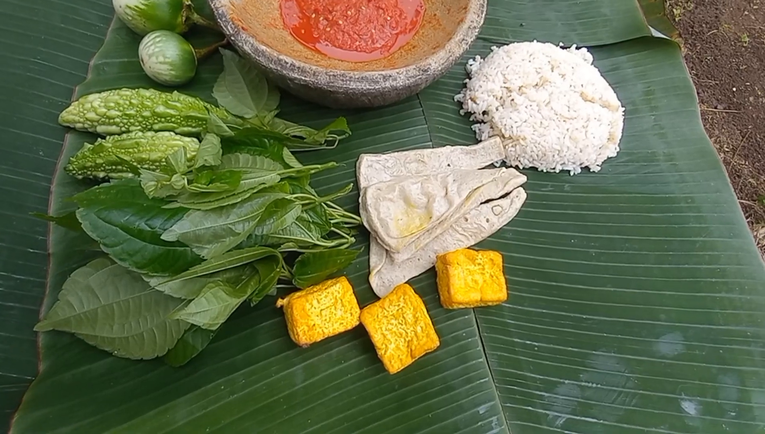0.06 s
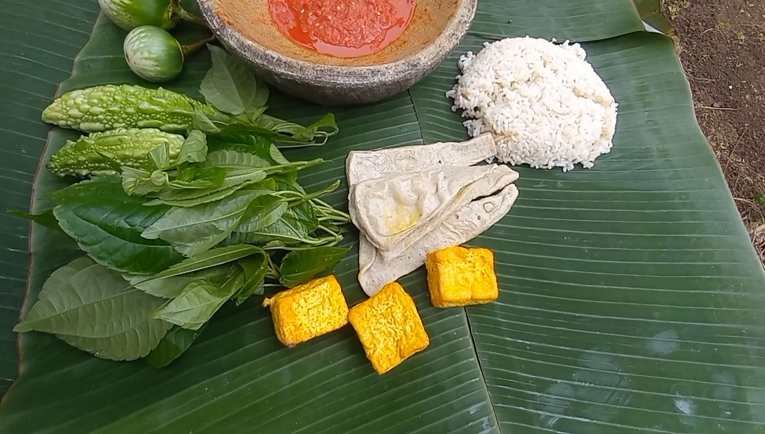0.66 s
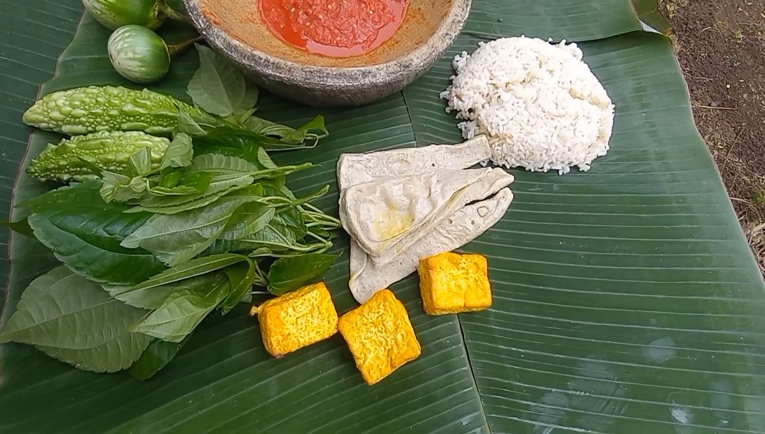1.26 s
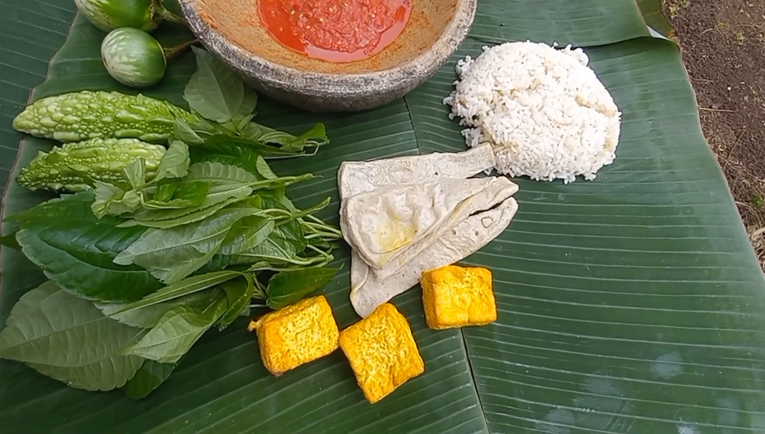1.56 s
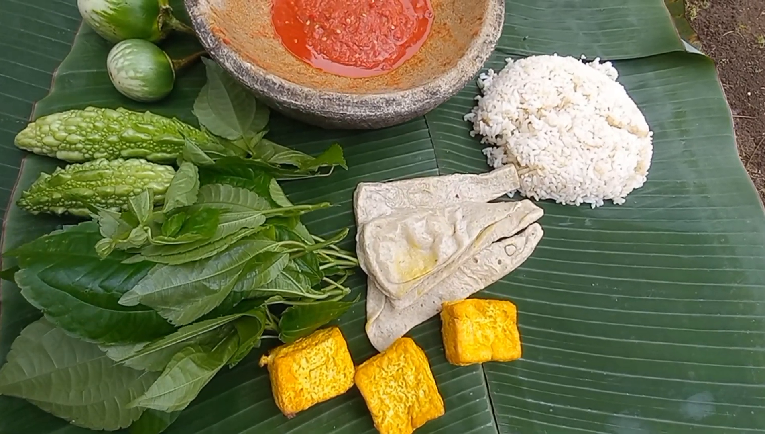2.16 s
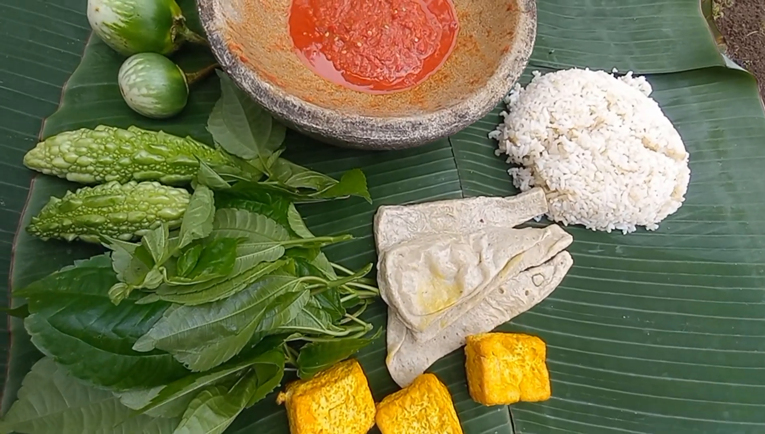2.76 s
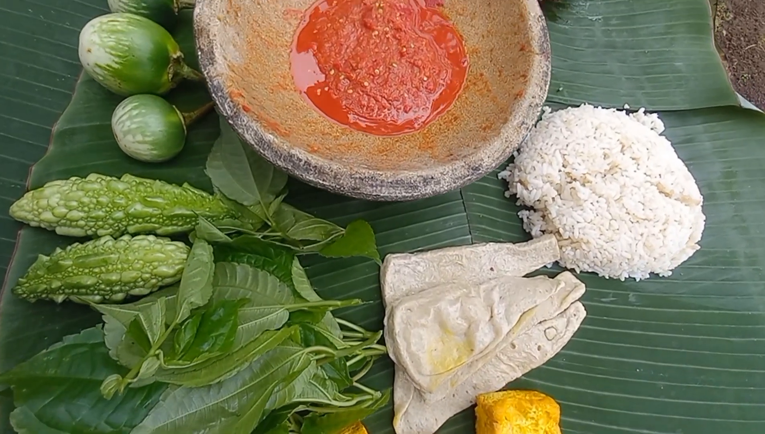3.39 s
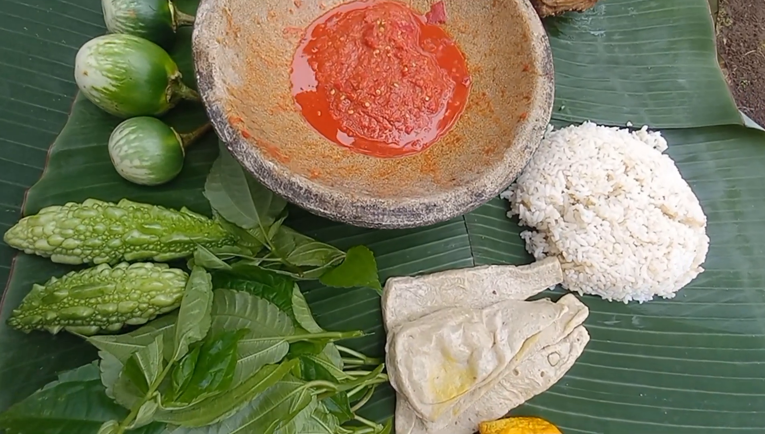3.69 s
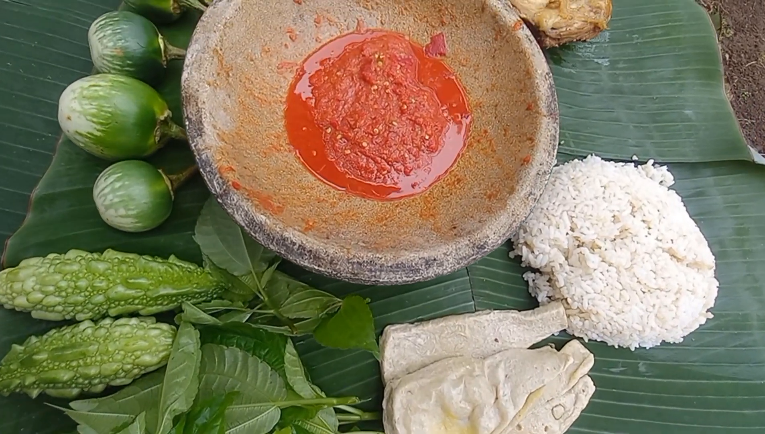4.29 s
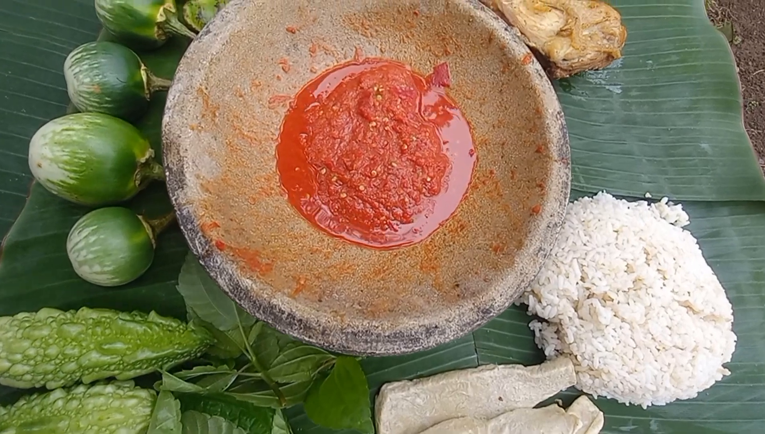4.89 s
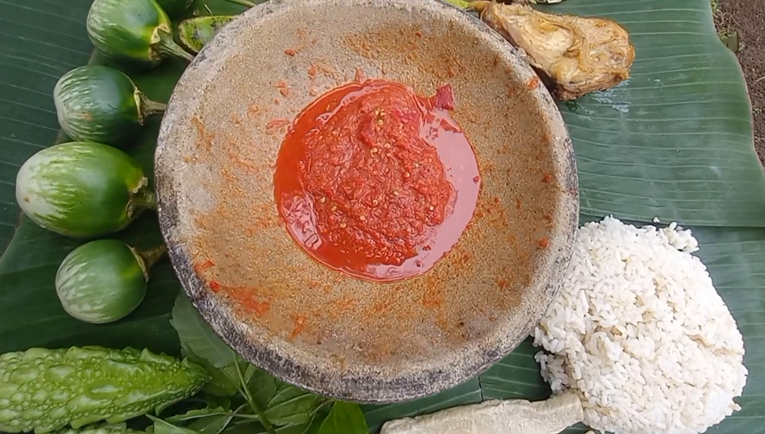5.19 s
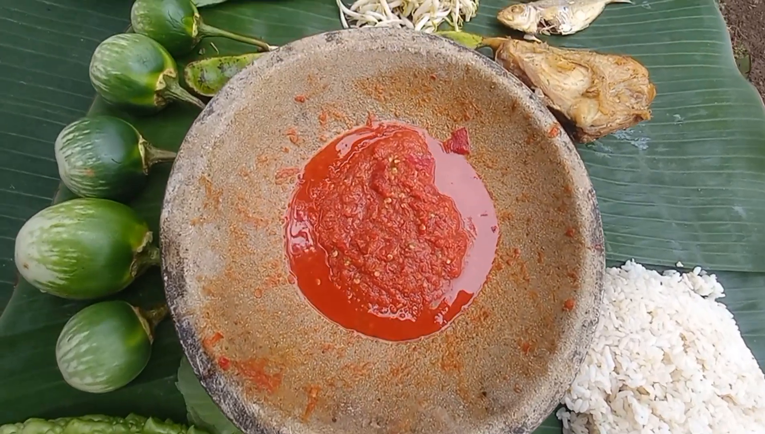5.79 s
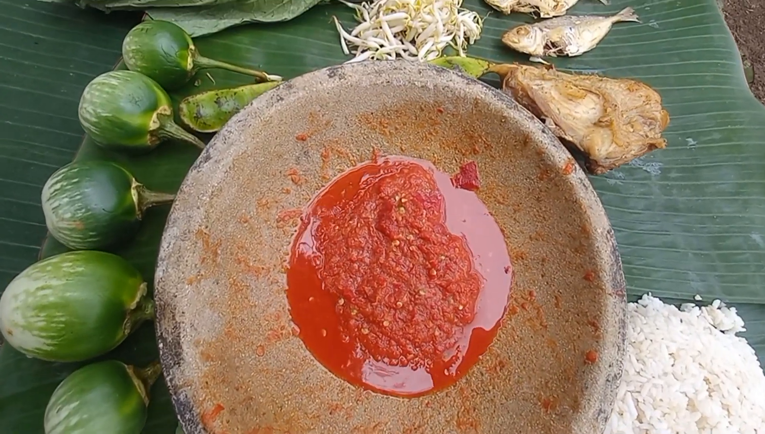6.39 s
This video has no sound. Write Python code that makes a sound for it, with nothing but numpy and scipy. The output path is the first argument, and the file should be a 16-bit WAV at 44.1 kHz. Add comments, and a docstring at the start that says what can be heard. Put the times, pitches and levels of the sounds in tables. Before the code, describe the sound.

High slurred bird whistles, then rapid trills and buzzes, sound close by, with faint distant birdsong and a low traffic-like hum behind.

```python
"""A garden opens on a low rumble like far traffic, a light hiss and soft, distant notes and warbles.
Half a second in, a close songbird sings pure slurred whistles that step down from high hooks to low
scoops; leaves and walls give a short echo, and faint dry ticks come and go. Distant notes fill its pause.
From about 4.4 s it sings chips, then pulsed trills and buzzes made by a fast flutter of its syrinx,
with one dull knock early in the phrase. After 6 s the distant notes are left over the background."""
import sys
import numpy as np
from scipy import signal
from scipy.fft import rfft, irfft, next_fast_len
from scipy.io import wavfile
from scipy.ndimage import map_coordinates

SR = 44100
rng = np.random.default_rng(int(sys.argv[2]) if len(sys.argv) > 2 else 0)


def pcm_store(signal):
    """Save signal as 16-bit PCM."""
    levels = np.round(np.clip(np.atleast_2d(signal), -1, 1) * 32767)
    wavfile.write(sys.argv[1], SR, levels.astype(np.int16).T)


N = 293265

# Cue levels are fader settings, ahead of each layer's trim and EQ.
# Whistle cues of the near bird: shape, start_s, length_s, pitch_hz, level_db
NEAR_WHISTLES = [ ("hook", .501, .083, 6970, -51.5), ("hook", .654, .089, 6890, -39),
                 ("hook", .82, .093, 6770, -39.5), ("peak", .973, .062, 5880, -36.5),
                 ("peak", 1.074, .065, 5730, -32), ("peak", 1.171, .061, 5710, -31),
                 ("peak", 1.276, .065, 5800, -32.5), ("dip", 1.374, .153, 3685, -31.2),
                 ("dip", 1.576, .152, 3625, -29), ("wave", 1.783, .156, 3790, -29),
                 ("step", 1.99, .151, 3015, -31.3), ("step", 2.192, .15, 2975, -31.3),
                 ("arch", 2.39, .033, 3064, -33.5), ("rise", 2.421, .047, 3586, -30.5),
                 ("scoop", 2.499, .191, 2615, -32.4), ("scoop", 2.74, .189, 2680, -35.5),
                 ("scoop", 2.989, .195, 2515, -35.6), ("spire", 3.256, .102, 4160, -38.5),
                 ("rise", 4.429, .042, 4286, -47), ("vee", 4.662, .024, 4410, -38.5),
                 ("fall", 4.697, .046, 5580, -37.5), ("rise", 4.784, .022, 4100, -46),
                 ("rise", 4.812, .052, 3750, -40.5), ("rise", 5.447, .042, 3340, -38),
                 ("zigzag", 5.674, .059, 4400, -37), ("arch", 5.766, .019, 4420, -36),
                 ("fall", 5.782, .015, 3050, -37.5)]
# Distant whistles, plus at 4.428 s a low undertone an octave below the near bird's rising chip:
# shape, start_s, length_s, pitch_hz, level_db
SOFT_NOTES = [ ("hook", .018, .085, 6600, -73), ("hook", .205, .075, 6600, -70),
              ("dip", .368, .125, 3600, -70), ("hook", .6, .1, 5300, -65), ("curl", .796, .108, 3120, -68),
              ("level", .815, .065, 5600, -65), ("level", 1.04, .13, 4420, -58),
              ("curl", 1.056, .108, 3050, -66), ("climb", 1.69, .11, 3100, -68),
              ("slide", 1.88, .09, 6400, -67), ("level", 2.793, .124, 6800, -55),
              ("fall", 3.507, .077, 3950, -65), ("vee", 3.637, .075, 5850, -59),
              ("level", 3.755, .092, 5400, -60), ("fall", 3.865, .08, 4500, -62),
              ("arch", 4.428, .07, 2150, -44.5), ("arch", 4.45, .123, 6700, -58),
              ("fall", 4.755, .04, 5400, -57), ("fall", 4.893, .055, 4900, -53),
              ("climb", 4.978, .014, 4800, -50), ("arch", 5.044, .052, 4990, -54),
              ("climb", 5.165, .075, 3750, -58), ("level", 5.279, .103, 2120, -51),
              ("slide", 5.355, .095, 4400, -56), ("level", 5.536, .097, 3180, -53),
              ("peak", 6.08, .085, 4400, -59), ("peak", 6.228, .092, 4400, -60),
              ("climb", 6.38, .08, 3400, -60), ("arch", 6.45, .058, 4200, -57),
              ("vee", 6.565, .09, 3650, -58)]
# Whistle repertoire, by shape: attack_share, release_share, swell_db, [(note_share, pitch_ratio)]
WHISTLE_SHAPES = { "hook": (.43, .27, 13, [(0, 1.1), (.35, 1.03), (.65, 1), (.81, .88), (1, .63)]),
                  "peak": (.24, .29, 2, [(0, .79), (.2, .815), (.51, 1), (.82, .75), (1, .6)]),
                  "dip": (.25, .19, -1.5, [(0, 1.21), (.315, 1.15), (.565, 1), (.88, 1.21), (1, 1.22)]),
                  "wave": (.22, .13, -5, [(0, 1.06), (.26, 1), (.5, 1.12), (.87, .88), (1, .69)]),
                  "step": (.14, .19, -.8, [(0, .71), (.25, 1), (.5, .985), (.64, 1.06), (.78, 1.5),
                  (.87, 1.15), (1, .82)]), "scoop": (.12, .125, -1.5, [(0, 1.375), (.14, 1.19), (.46, 1),
                  (.73, 1.16), (.85, 1.39), (.92, 1.75), (1, 2.5)]), "spire": (.2, .15, -4, [(0, .52),
                  (.27, .63), (.49, .72), (.61, 1), (.73, .74), (1, .54)]), "rise": (.38, .28, 0, [(0, .64),
                  (.35, .91), (.72, 1), (1, .96)]), "arch": (.35, .25, -2, [(0, .88), (.35, 1), (1, .7)]),
                  "fall": (.35, .3, -5, [(0, 1.28), (.4, 1), (1, .74)]), "climb": (.3, .3, 0, [(0, .85),
                  (.5, 1), (1, 1.24)]), "curl": (.15, .15, 0, [(0, .93), (.2, 1.12), (.58, 1), (1, 1.28)]),
                  "slide": (.15, .2, 0, [(0, 1.1), (1, .9)]), "level": (.25, .3, 0, [(0, 1.025),
                  (1, .975)]), "vee": (.3, .15, 0, [(0, 1.25), (.5, 1), (1, 1.35)]),
                  "zigzag": (.1, .15, 0, [(0, 1.02), (.15, 1.11), (.27, 1.34), (.37, .75), (.53, 1.17),
                  (.63, .755), (.7, 1.01), (.85, .91), (1, .97)])}
# Trills of the near bird, plus the soft "warble" rows from farther off:
# voice, start_s, length_s, flutter_hz, swing_hz, level_db, [pitch_hz at even steps]
TRILL_CUES = [ ("warble", .06, .32, 141, 141, -62.5, [2050, 2520, 2960]),
              ("warble", .43, .075, 51, 450, -62, [4580, 4520]),
              ("warble", .64, .085, 51, 550, -56, [4600, 4450]),
              ("warble", .85, .1, 51, 550, -56, [4670, 4360]),
              ("warble", 3.91, .24, 141, 60, -54.5, [2440, 2320, 2200]),
              ("rasp", 4.898, .066, 660, 450, -43.5, [4600, 3300, 2500, 2080]),
              ("chip", 4.987, .015, 342, 254, -34, [3000, 3630, 3200]),
              ("rasp", 5.052, .036, 446, 300, -39, [2810, 2620]),
              ("pulsed", 5.08, .092, 70.8, 485, -34, [2450, 2700, 2950, 2840]),
              ("pulsed", 5.2085, .148, 89.4, -400, -33.3, [4950, 5620, 5450]),
              ("rasp", 5.432, .022, 626, 395, -38, [2800, 3000]),
              ("twang", 5.483, .066, 501, 380, -33, [4600, 4420, 4640, 4450, 4150]),
              ("rasp", 5.616, .028, 776, 952, -33, [3900, 4450, 4150, 4600, 3700]),
              ("pulsed", 5.796, .046, 91, 211, -33.5, [2480, 2230, 2050]),
              ("rasp", 5.882, .033, 724, 657, -40.5, [3270, 4070, 3700, 3320]),
              ("buzz", 5.916, .142, 228.1, 260, -34.3, [3150, 3890, 3850, 3050, 2750, 2650])]
# Kinds of flutter, by voice: chop_depth (over 1 leaves silent gaps), roughness, undertone_gain,
# attack_share, release_share, swell_db
TRILL_VOICES = {"warble": (.48, .25, .02, .35, .3, 2), "pulsed": (1.05, .09, .003, .08, .1, 0),
                "twang": (.31, .22, .12, .15, .3, -1), "rasp": (.33, .22, .04, .3, .33, -3),
                "chip": (.2, .04, 0, .55, .4, 0), "buzz": (.16, .1, .004, .27, .14, -8)}
# How strongly the throat carries each pitch: pitch_hz, gain_db
THROAT_EQ = [(2000, -17), (2550, -9.4), (3000, -.5), (3800, -2), (4400, -2.5), (4900, -1.5), (6200, -.5),
             (7000, -5), (7700, -23)]
# Pan of the main song: time_s, left_minus_right_db
SONG_PAN = [(.7, 1.5), (1.2, 2), (1.7, 0.5), (2.1, -2), (2.8, 0.5), (4.7, -3), (5.8, -2)]
# Tone of the reflections off leaves and walls: frequency_hz, gain_db
ECHO_EQ = [(2000, -6), (3200, 7.5), (4400, 6.5), (6000, 9.5), (8000, -10), (14000, -26)]
# Fader rides of the low drone and the rumble around it: time_s, level_db
DRONE_RIDE = [(0.0, -67), (0.96, -68), (1.11, -48), (1.22, -74), (1.41, -52), (1.65, -63), (2.04, -49),
              (2.81, -54), (3.11, -74), (3.28, -49), (3.46, -69), (3.59, -52), (3.83, -74), (4.04, -51),
              (5.3, -66), (5.46, -49), (5.58, -61), (6.65, -54)]
RUMBLE_RIDE = [(0.0, -56), (0.09, -60), (1.93, -54), (2.57, -58), (3.37, -52), (3.52, -59), (5.74, -54),
               (5.81, -65), (5.98, -54), (6.65, -55)]
# Slow drift of the drone: time_s, pitch_hz
DRONE_DRIFT = [(0, 87), (2, 76), (3.3, 78), (4.2, 86), (5.5, 81), (6.5, 86.8)]
# Fader rides of the open air: time_s, wash_db, hiss_db
AIR_RIDE = [(0.0, -79.5, -81.5), (0.74, -79, -76.5), (2.09, -76.5, -69), (4.02, -78, -68.5),
            (4.18, -73, -68.5), (4.83, -72, -61), (6.0, -72.5, -75), (6.65, -74.5, -74.5)]
# Soft swells of the hiss: centre_s, half_width_s, rise_db
HISS_SWELLS = [(2.24, .09, 6), (2.9, .06, 4), (3.6, .08, 3)]
# Dry ticks that stand out of the crackle: start_s, level_db
TICK_CUES = [(1.1493, -43), (1.3174, -47), (2.835, -41), (2.9427, -48), (3.479, -50), (3.6262, -48),
             (4.1435, -45), (4.2018, -46), (4.555, -42), (4.9327, -40), (5.1262, -44), (5.3887, -45)]
# Tone of each background layer: frequency_hz, gain_db
RUMBLE_EQ = [(20, -22), (55, -12), (75, -8.5), (100, 1), (130, 1), (185, -6.5), (255, -7.5), (310, -18),
             (450, -31), (1000, -61), (3000, -107)]
WASH_EQ = [(100, -17), (400, -0.5), (700, -1), (1400, -7), (2400, -1), (4000, -16), (8000, -18),
           (16000, -32)]
HISS_EQ = [(300, -28), (1500, -3.5), (3000, 3), (6000, 2), (9000, -2.5), (13000, -7), (16000, -7)]
TICK_EQ = [(300, -24), (1300, -13), (2600, 8), (7000, 8.5), (11000, 7), (16000, 0)]
KNOCK_EQ = [(150, 0), (320, 18), (560, 24), (1100, -4), (3000, -30)]
# Stereo image of the noise beds: frequency_hz, correlation (1 is mono)
RUMBLE_IMAGE = [(25, 0.82), (70, 0.78), (130, 1), (260, 0.87), (500, 0.29)]
AIR_IMAGE = [(300, 0.98), (1000, 0.3), (3000, 0.13), (9000, 1)]


def main_song(trill_db=.5, leaves_db=-18.5, walls_db=-31):
    """The close singer's whistles and trills, plus soft warbles from farther off, with a short echo."""
    song = amp(trill_db) * trills() + whistles(NEAR_WHISTLES, jitter=.0042, shimmer_db=.85)
    leaves = amp(leaves_db) * echo(song, t60_s=.049, build_s=.0059)
    walls = amp(walls_db) * echo(song, t60_s=.3, build_s=.0053)
    return place(song) + leaves + walls


def whistles(cues, jitter, shimmer_db):
    """A row of slurred whistles, each a shape of the repertoire stretched to its length and pitch."""
    song = np.zeros(N)
    for shape, start_s, length_s, pitch_hz, level_db in cues:
        attack, release, swell_db, ratios = WHISTLE_SHAPES[shape]
        contour = np.array(ratios) * [1, pitch_hz]
        hz, envelope = note_gesture(length_s, contour, level_db, attack, release, swell_db)
        add(song, start_s, envelope * syrinx_tone(hz, jitter, shimmer_db))
    return song


def syrinx_tone(hz, jitter, shimmer_db, second_db=-54, third_db=-42, leak_hz=12000, leak_width_hz=1300):
    """The syrinx sings an almost pure tone; the throat lets its third harmonic out in one high band."""
    hz = hz * (1 + jitter * wobble(250, len(hz)))
    phase = cycles(hz)
    leak = amp(third_db) * np.exp(-((3 * hz - leak_hz) / leak_width_hz) ** 2)
    overtones = amp(second_db) * np.sin(2 * phase) + leak * np.sin(3 * phase)
    shimmer = amp(shimmer_db * wobble(126.3, len(hz)))
    return shimmer * (np.sin(phase) + overtones)


def trills(rasp_hz=700, rate_scatter=.25, shimmer_db=-.5, lowpass_hz=7000):
    """A flutter of the syrinx swings the pitch and chops the tone: slow gives pulses, fast a buzz."""
    song = np.zeros(N)
    for voice, start_s, length_s, flutter_hz, swing_hz, level_db, pitches in TRILL_CUES:
        chop, roughness, undertone, attack, release, swell_db = TRILL_VOICES[voice]
        contour = np.c_[np.linspace(0, 1, len(pitches)), pitches]
        hz, envelope = note_gesture(length_s, contour, level_db, attack, release, swell_db)
        unevenness = 1 + rate_scatter * roughness * wobble(400, len(hz))
        flutter = -np.cos(cycles(flutter_hz * unevenness))
        carrier = cycles(hz + rasp_hz * roughness * wobble(1200, len(hz)))
        swing = cycles(swing_hz * flutter)
        gate = np.maximum(1 - chop * (1 - flutter) / 2, 0) ** 2
        shimmer = amp(shimmer_db * wobble(150, len(hz)))
        # period doubling adds partials at a half and at one and a half times the pitch
        doubling = np.sin((carrier + swing) / 2) + np.sin(1.5 * carrier + swing)
        tone = np.sin(carrier + swing) + undertone * doubling
        add(song, start_s, envelope * gate * shimmer * tone)
    return filtered(song, lambda hz: 1 / np.sqrt(1 + (hz / lowpass_hz) ** 20))


def note_gesture(length_s, contour, level_db, attack, release, swell_db):
    """Pitch and envelope of a note: it fades in and out, louder where the throat favours its pitch."""
    progress = np.linspace(0, 1, max(round(length_s * SR), 64))
    hz = glide(*np.transpose(contour), progress)
    gain = amp(level_db + along(THROAT_EQ, hz) + swell_db * (progress - .5))
    fade = lambda x: np.sin(np.pi / 2 * np.clip(x, 0, 1)) ** 2
    return hz, np.sqrt(2) * gain * fade(progress / attack) * fade((1 - progress) / release)


def place(song, notch_hz=5300, width_hz=1100, notch_gain=.17):
    """Pans the song; a reflection close by on the right cancels one narrow band on that side."""
    def notch(hz):
        detuning = notch_hz ** 2 - hz ** 2
        damping = 1j * hz * width_hz
        return (detuning + damping * notch_gain) / (detuning + damping)
    pan_gain = amp(automation(SONG_PAN)[0] / 2)
    return np.array([song * pan_gain, filtered(song, notch) / pan_gain])


def echo(song, t60_s, build_s):
    """Scattered reflections that build up and die away, different at each ear."""
    t = np.arange(SR // 2) / SR
    onset = 1 - np.exp(-(t / build_s) ** 2)
    tail = rng.standard_normal((2, len(t))) * amp(-60 * t / t60_s) * onset
    wet = signal.fftconvolve(song[None], tail / np.linalg.norm(tail[0]), axes=1)[:, :N]
    return equalise(wet, ECHO_EQ)


def soft_notes(direct_db=.5, echo_db=-6.5):
    """A wetter layer: distant whistles, and a low undertone an octave below the near bird's rising chip."""
    song = whistles(SOFT_NOTES, jitter=.008, shimmer_db=1.6)
    return amp(direct_db) * song + amp(echo_db) * echo(song, t60_s=.33, build_s=.0034)


def rumble(drone_db=-.2, body_db=1):
    """The low bed, like far traffic: a wavering drone inside broad, uneven noise."""
    hz = automation(DRONE_DRIFT)[0] * (1 + .0409 * wobble(25))
    drone_gain = amp(automation(DRONE_RIDE)[0] + drone_db + 1.8 * wobble(14))
    drone = drone_gain * np.sqrt(2) * np.sin(cycles(hz))
    body_gain = amp(automation(RUMBLE_RIDE)[0] + body_db + 1.45 * wobble(17))
    return drone + body_gain * noise_bed(RUMBLE_EQ, RUMBLE_IMAGE) * lean_left(.3)


def air(wash_trim_db=4):
    """The even wash of the open air and a light, restless hiss above it."""
    t = np.arange(N) / SR
    wash_db, hiss_db = automation(AIR_RIDE)
    flicker_db = 1.7 * wobble(10) + 1.2 * wobble(90)
    swell_db = sum(db * np.exp(-((t - centre_s) / half_s) ** 2) for centre_s, half_s, db in HISS_SWELLS)
    hiss = amp(hiss_db + swell_db + flicker_db) * noise_bed(HISS_EQ, AIR_IMAGE) * lean_left(.8)
    wash = amp(wash_db + wash_trim_db) * noise_bed(WASH_EQ, AIR_IMAGE)
    return wash + hiss


def ticks(tick_db=-8.5, crackle_db=-1, crackles_per_s=90, spread_db=2.1, t60_s=.014, attack_s=.0005):
    """A few soft dry ticks over a fine crackle that grows with the hiss; each has its own colour."""
    track, t = np.zeros((2, N)), np.arange(SR // 40) / SR
    envelope = amp(-60 * t / t60_s) * (1 - np.exp(-t / attack_s))
    hiss_db = automation(AIR_RIDE)[1]
    cues = [(start_s, level_db + tick_db) for start_s, level_db in TICK_CUES]
    for position, chance in rng.random((int(crackles_per_s * N / SR), 2)):
        accent_db = -spread_db * np.log(max(chance, .02))  # most are faint, a few poke out
        cues.append((position * N / SR, hiss_db[int(position * N)] + crackle_db + accent_db))
    for start_s, level_db in cues:
        centre = rng.standard_normal(len(t))
        sides = 1.58 * rng.standard_normal((2, len(t)))
        spectrum = rfft(centre + sides)
        tint_db = 3 * signal.resample(rng.standard_normal(6), spectrum.shape[1])
        burst = irfft(spectrum * amp(tint_db), len(t))
        add(track, start_s, amp(level_db) * envelope * burst)
    return equalise(track, TICK_EQ) * lean_left(1)


def knock(start_s=4.744, burst_db=-58, t60_s=.09):
    """One soft, dull knock: a quickly dying noise burst with its low mids boosted."""
    track, t = np.zeros(N), np.arange(SR // 5) / SR
    add(track, start_s, amp(burst_db - 60 * t / t60_s) * rng.standard_normal(len(t)))
    return equalise(track, KNOCK_EQ)


def noise_bed(eq, image):
    """Coloured stereo noise of rms 1, its width set band by band."""
    def mid_side(hz):
        angle = np.arccos(np.clip(along(image, hz), -1, 1)) / 2
        return amp(along(eq, hz)) * [np.cos(angle), np.sin(angle)]
    mid, side = filtered(rng.standard_normal((2, N)), mid_side)
    bed = np.array([mid + side, mid - side])
    return bed / np.sqrt(np.mean(bed ** 2) + 1e-20)


def amp(db):
    """Decibels to gain."""
    return 10 ** (np.asarray(db) / 20)


def lean_left(db):
    """Stereo gains: left up and right down by db."""
    return amp([[db], [-db]])


def along(points, hz):
    """Reads (frequency_hz, value) points on a log axis."""
    frequencies, values = np.transpose(points)
    return np.interp(np.log(hz + 1), np.log(frequencies), values)


def automation(rows):
    """One lane, a value per sample, for each column after time_s."""
    times, *columns = np.transpose(rows)
    return [np.interp(np.arange(N) / SR, times, column) for column in columns]


def glide(knots, values, at):
    """A smooth line through the points that turns at them without overshoot."""
    step = np.maximum(np.diff(knots), 1e-4)
    slope = np.diff(values) / step
    before, after = slope[:-1], slope[1:]
    inner = 2 * np.maximum(before * after, 0) / (before + after + 1e-20)  # flat at each turn
    tangent = np.r_[slope[0], inner, slope[-1]]
    i = np.clip(np.searchsorted(knots, at) - 1, 0, len(step) - 1)
    share = np.clip((at - knots[i]) / step[i], 0, 1)
    bend = (tangent[i] - slope[i]) * (1 - share) - (tangent[i + 1] - slope[i]) * share
    return values[i] + step[i] * share * (slope[i] + (1 - share) * bend)


def wobble(knots_per_s, size=N):
    """A smooth random modulator."""
    knots = rng.standard_normal(int(size * knots_per_s / SR) + 4)
    return map_coordinates(knots, [np.arange(size) * knots_per_s / SR])


def cycles(hz):
    """Phase in radians of an oscillator that follows a pitch curve."""
    return 2 * np.pi * np.cumsum(hz) / SR


def filtered(sound, response):
    """Shapes a sound with a gain given as a function of frequency."""
    size = next_fast_len(N + SR // 2)
    hz = np.fft.rfftfreq(size, 1 / SR)
    return irfft(rfft(sound, size) * response(hz), size)[..., :N]


def equalise(sound, eq):
    """Runs a sound through an EQ table."""
    return filtered(sound, lambda hz: amp(along(eq, hz)))


def add(track, start_s, sound):
    """Mixes a sound into a track at its cue."""
    part = track[..., max(round(start_s * SR), 0):][..., :sound.shape[-1]]
    part += sound[..., :part.shape[-1]]


def scene():
    """Near and distant birdsong over the garden's background."""
    return main_song() + soft_notes() + rumble() + air() + ticks() + knock()


def record(dry):
    """The master: a hard high cut and a small steady offset."""
    high_cut_hz, dc_offset = 15850, .0031
    return filtered(dry, lambda hz: hz < high_cut_hz) + dc_offset


dry = scene()
out = record(dry)
pcm_store(out)
```